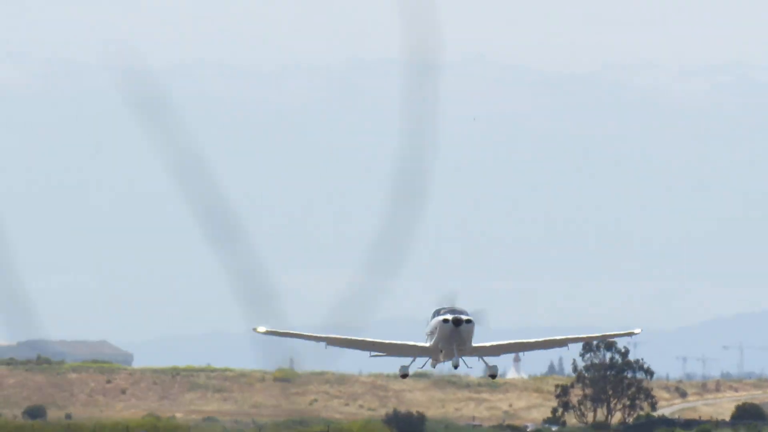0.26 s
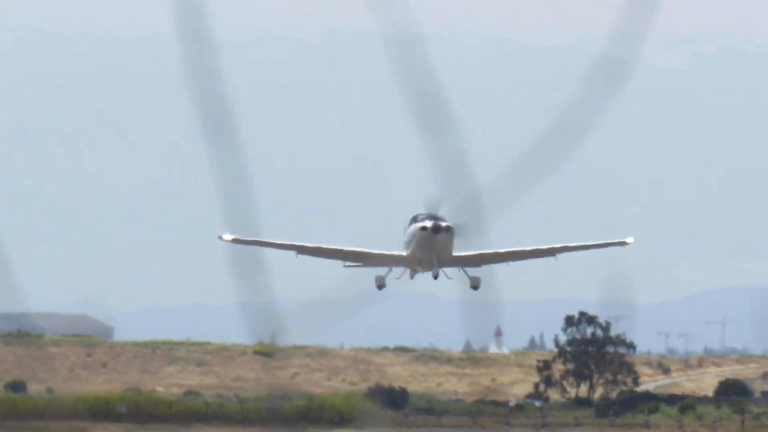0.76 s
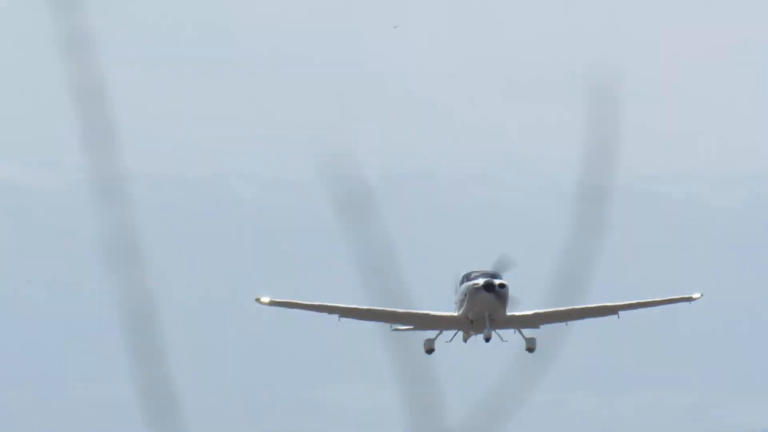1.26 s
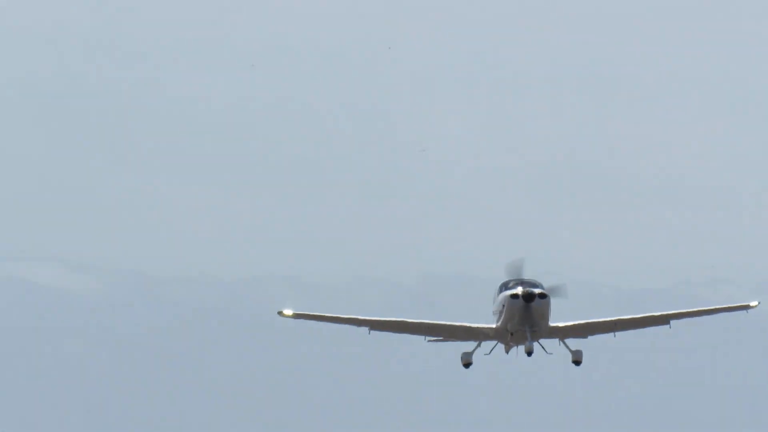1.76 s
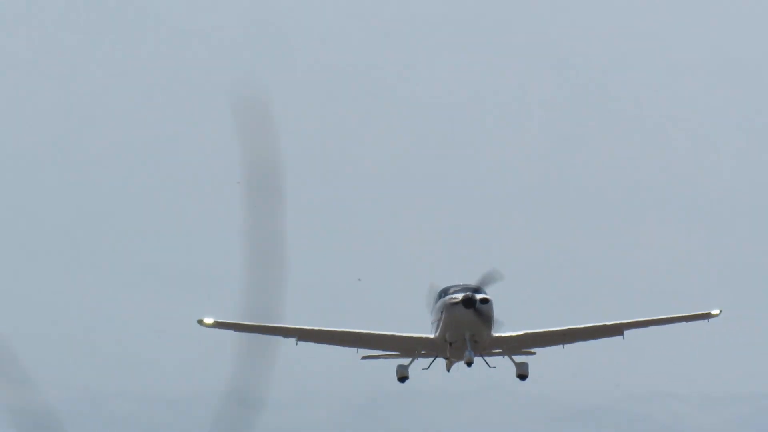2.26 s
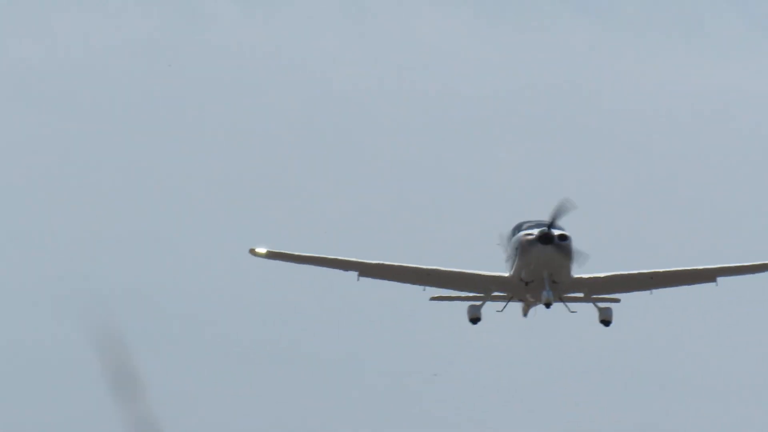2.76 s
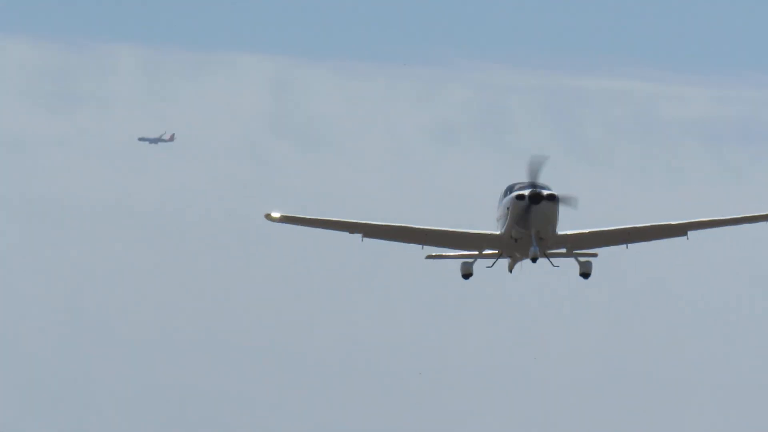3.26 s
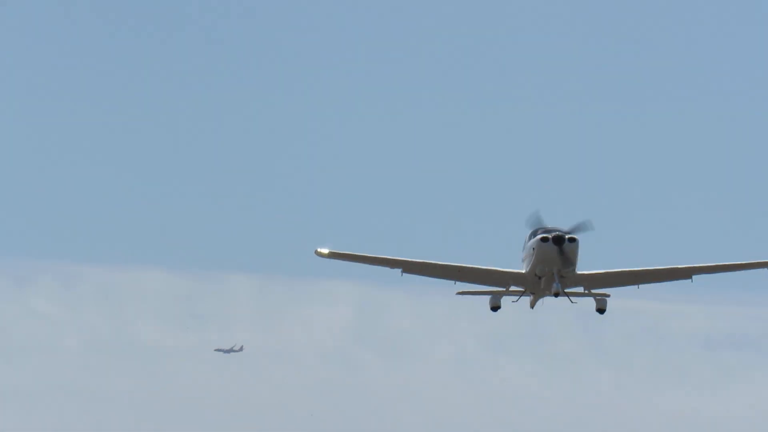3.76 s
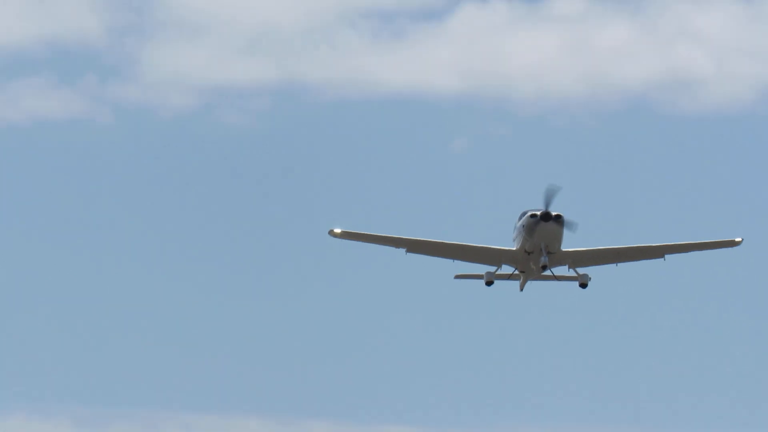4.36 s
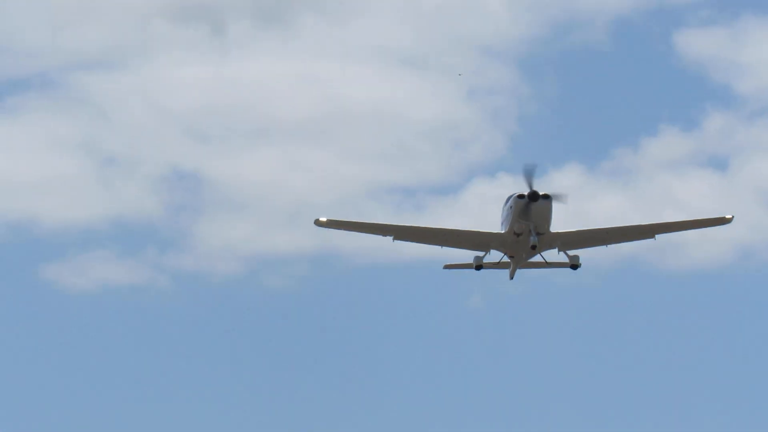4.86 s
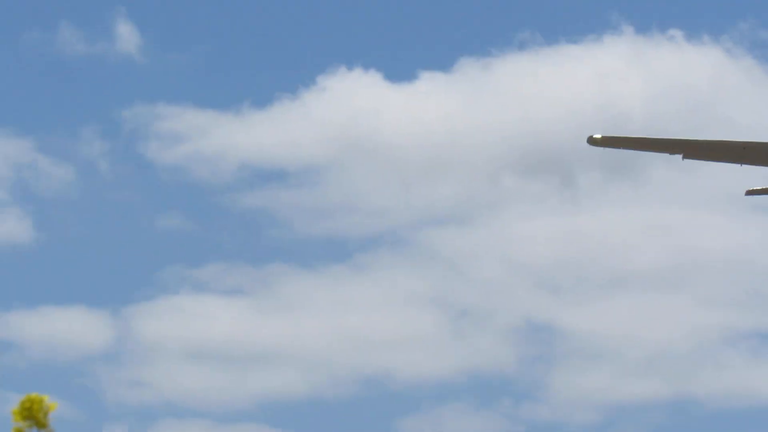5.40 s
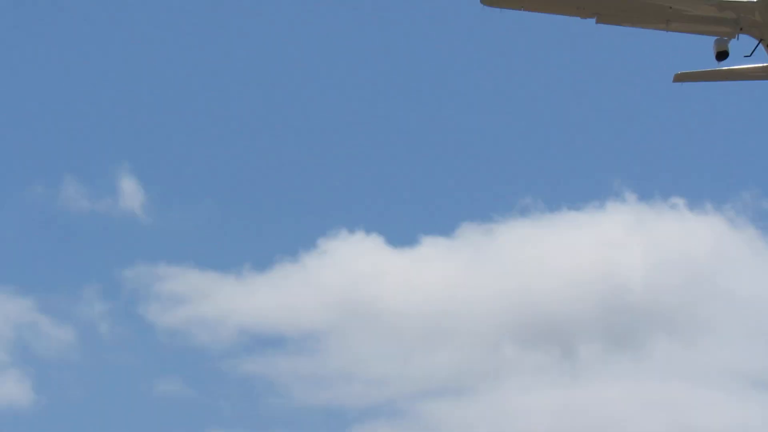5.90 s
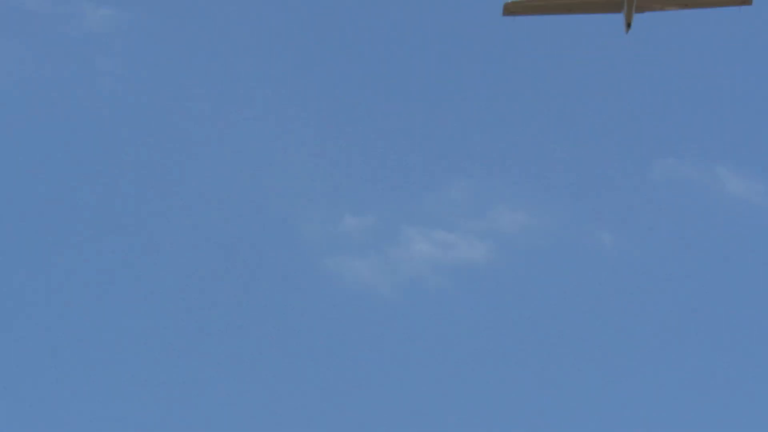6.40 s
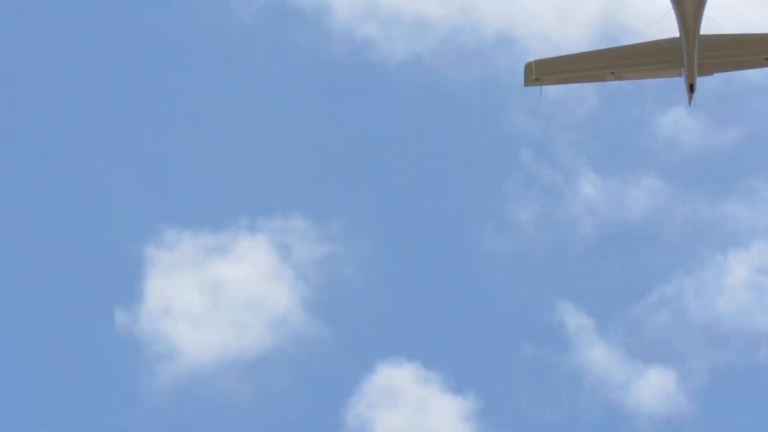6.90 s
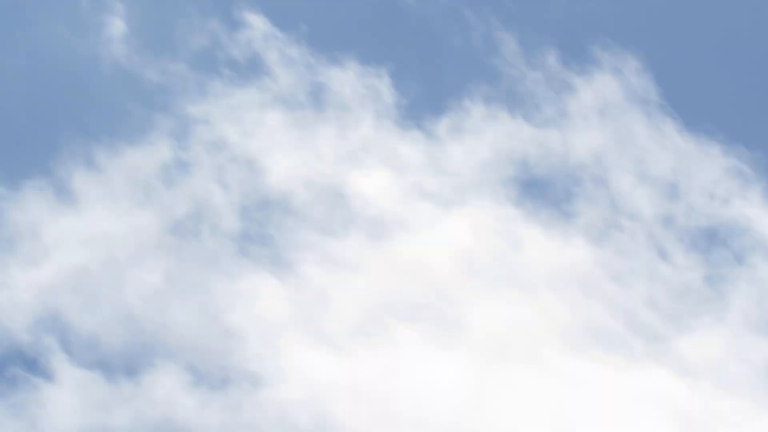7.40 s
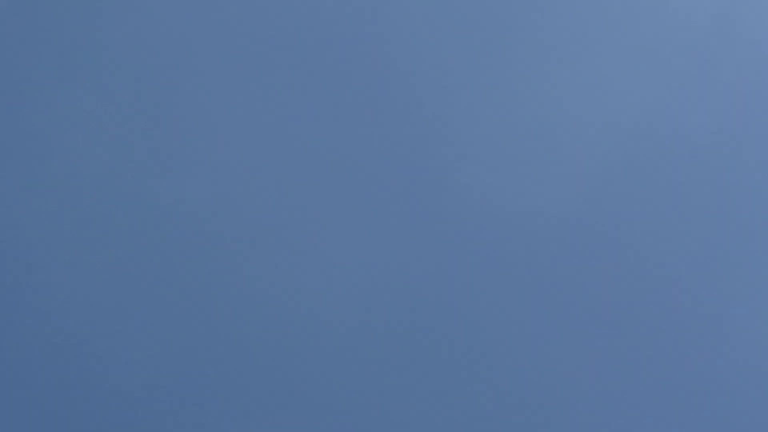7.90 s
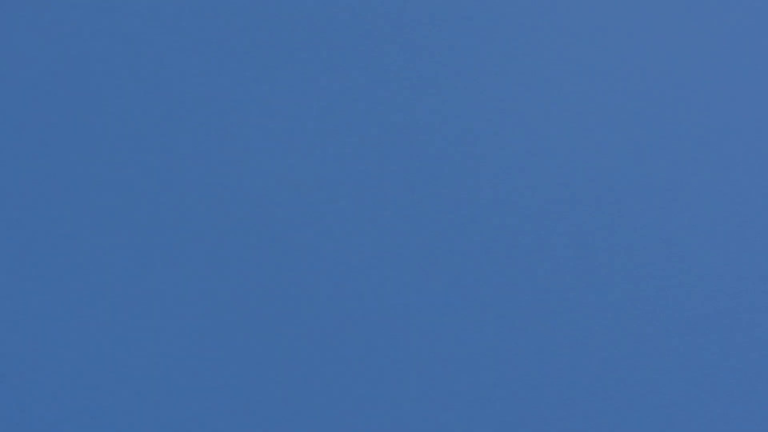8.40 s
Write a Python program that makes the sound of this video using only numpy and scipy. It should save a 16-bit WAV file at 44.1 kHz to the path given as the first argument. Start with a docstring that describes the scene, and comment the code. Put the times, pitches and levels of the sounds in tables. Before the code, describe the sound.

A small propeller plane approaches over a grassy airfield, its steady buzzing drone swelling and thinning with ground echo and moving air. Gusts rumble, flutter and slap the camera microphone, pushing left and right apart, with heavy crackle around three and six seconds and a few tiny handling ticks. Near the end the plane roars overhead, barking and hissing, its pitch dropping.

```python
"""Out on an airfield, gusts slap the microphone from the start while a propeller plane drones far off.
It climbs off the runway toward the camera: six-cylinder exhaust and two-blade propeller are built on one shaft's
turns, the blades chop the air noise, and an echo off the ground makes the tones swell and cancel.
Thick spells of turbulence crackle near 3.3 and 6.4 s, pushing the two channels apart and at times overloading them.
Just after 8 s the plane passes right overhead, its drone sinking in pitch as the travel time of the sound changes."""
import sys
import numpy as np
from scipy import signal
from scipy.fft import rfft, irfft, next_fast_len
from scipy.io import wavfile
from scipy.ndimage import uniform_filter1d, map_coordinates

SR = 44100
rng = np.random.default_rng(int(sys.argv[2]) if len(sys.argv) > 2 else 0)


def file_out(sig):
    """Save sig as 16-bit WAV at sys.argv[1]."""
    # one column per channel
    cols = np.atleast_2d(sig).T
    # limit, then scale
    lim = np.clip(cols, -1, 1)
    pcm = np.round(lim * 32767).astype(np.int16)
    wavfile.write(sys.argv[1], SR, pcm)


N = 381465

# Colour of the air rush with the nose toward the microphone. Each row: frequency in Hz, relative level in dB.
RUSH_AHEAD = [(30, -18), (100, 9.5), (400, 5), (680, 3), (810, 7), (940, 2.5), (1180, 3.5), (1620, -2),
              (1870, 7.5), (2350, .5), (2830, -5), (3150, -3.5), (3600, -8), (5500, -20), (10000, -36.5),
              (16000, -53.5)]
# Colour of the high hiss under the belly. Each row: frequency in Hz, relative level in dB.
HISS_BELOW = [(1500, -40), (3200, -5), (5300, 3.5), (6500, 0), (9000, -1.5), (12000, -4.5), (15000, -12)]
CLOSEST_M, SOUND_M_PER_S = 36.94, 343


def plane(shimmer_db=1.0, rush_width_db=-14, hiss_width_db=-17):
    """Shaft-locked engine and blades sit in the centre; scattered air noise spreads them a little to the sides."""
    # Swells and lulls as restless air carries the sound. Each row: centre in seconds, width in seconds, gain in dB.
    air_swells = [(.22, .4, 3), (1.28, .25, 4), (1.7, .3, 4), (2.33, .55, 9.5), (3.88, .25, 2.5),
                  (4.62, .5, 4.5), (5.05, .2, 3), (5.45, .22, 6), (5.75, .3, 2), (6.15, .15, 1),
                  (6.55, .15, -2), (6.7, .1, 1), (6.85, .1, -3), (7.03, .09, -4.5), (7.25, .14, 2),
                  (7.6, .1, 3), (7.79, .17, 4), (7.96, .1, 1.5)]
    # Colour of the air rush under the belly. Each row: frequency in Hz, relative level in dB.
    rush_below = [(30, -18.5), (100, 0), (400, 8), (700, 2), (1000, -2), (1550, 6), (2100, -3),
                  (2800, -3.5), (3800, -7.5), (5500, -13), (10000, -22), (16000, -64.5)]
    # Colour of the high hiss from ahead. Each row: frequency in Hz, relative level in dB.
    hiss_ahead = [(1500, -30), (3200, 3), (5300, 4), (6800, 2), (9000, -2), (12000, -18), (15000, -38)]

    turns, metres, angle = flight()
    swells_db = sum(db * swell(s, width) for s, width, db in air_swells)
    air = amp(swells_db + shimmer_db * wobble(7) * np.cos(np.radians(angle)))

    rasp_gain = air * carried(metres, loss_db_per_m=.047)
    rasp_gain = rasp_gain * beamed(angle, level_db=-39, beam_db=8, centre_deg=74, width_deg=38)
    rush_gain = air * carried(metres, loss_db_per_m=.045)
    rush_gain = rush_gain * beamed(angle, level_db=-37.3, beam_db=5.8, centre_deg=82, width_deg=30)
    hiss_gain = air * carried(metres, loss_db_per_m=.05)
    hiss_gain = hiss_gain * beamed(angle, level_db=-54.5, beam_db=15, centre_deg=82, width_deg=34)

    rush = rush_gain * aspect(angle, patchy(noise(RUSH_AHEAD)), noise(rush_below))
    hiss = hiss_gain * aspect(angle, noise(hiss_ahead), noise(HISS_BELOW))
    blades = rush * chop(turns, angle, .24, .64) + hiss * chop(turns, angle, .27, .72)
    direct = drone(turns, metres, angle) + near_echo(rasp_gain * rasp(turns, angle) + blades, angle)

    # The rush widens as the plane comes abeam.
    wide_rush = amp(rush_width_db) * np.sin(np.radians(angle)) * rush_gain * noise(rush_below)
    wide_hiss = amp(hiss_width_db) * hiss_gain * noise(HISS_BELOW)
    return opposed(wide_rush + wide_hiss, ground_echo(direct, angle) + hum(turns))


def drone(turns, metres, angle, waver_db=1.3, far_waver_db=.5, half_waver_db=3.0,
          drift=.02, far_drift=.012, skew=.1, loss_db_per_m=.033):
    """Whole shaft orders stay nearly in step; uneven cylinders add half orders; distance makes phases waver more."""
    # Engine and blade tones before wavering and distance. Each row: multiple of the shaft rate,
    # then level in dB far off, near, at a slant, abeam and behind.
    orders = [(2, -30, -30, -37, -33, -36), (3, -35, -33, -21.5, -27, -23), (3.5, -49, -49, -44, -41, -43),
              (4, -33, -31, -32, -31, -31), (4.5, -38, -36, -39, -31, -40), (5, -39, -39, -44, -44, -44),
              (5.5, -49, -49, -42, -42, -42), (6, -27, -31, -29, -20, -26), (6.5, -33, -35, -43, -41, -42),
              (7, -46, -48, -43, -51, -45), (7.5, -42, -46, -50, -47, -49), (8, -34, -41, -51, -42, -55),
              (9, -46, -46, -38, -24.5, -33), (10, -47, -33, -46, -46, -48),
              (11, -41.5, -33.5, -36, -50, -48), (11.5, -47, -47, -52, -49, -51),
              (12, -52, -52, -49, -26, -47), (13, -42, -41, -53, -55, -56), (14, -47, -48, -42, -50, -38),
              (16, -47, -47, -53, -57, -58), (18, -58, -58, -53, -52, -53), (19, -60, -60, -45, -54, -49)]
    # Angles from the nose in degrees for those five views: far off, near, at a slant, abeam, behind.
    view_deg = [12.5, 17, 36, 67, 108]

    far = 1 - CLOSEST_M / metres
    total = np.zeros(N)
    for order, *levels in orders:
        level_db = np.interp(angle, view_deg, levels)
        stray = (drift + far_drift * far) * wobble(25)  # in cycles of this tone
        if order % 1:
            total += amp(level_db + half_waver_db * wobble(9)) * tone(turns + stray / order, order)
        else:
            gain = amp(level_db + (waver_db + far_waver_db * far) * wobble(9))
            total += gain * np.sqrt(2) * np.cos(2 * np.pi * (order * turns + skew + stray))
    return carried(metres, loss_db_per_m) * total


def tone(turns, order):
    """A sine at one multiple of the shaft rate, from a random phase, at rms 1."""
    return np.sqrt(2) * np.sin(2 * np.pi * (order * turns + rng.random()))


def hum(turns, waver_db=1.8):
    """Single engine orders stand out for a while as the plane draws near."""
    # Each row: centre in seconds, width in seconds, multiple of the shaft rate, level in dB before wavering.
    hum_swells = [(2.65, 1.5, 8, -40.5), (4.65, 1.1, 8, -44)]
    return sum(amp(db + waver_db * wobble(6)) * swell(s, width) * tone(turns, order)
               for s, width, order, db in hum_swells)


def rasp(turns, angle, ahead_half_db=-2, below_half_db=-10, jitter_turns=.0009, sharp=1.5, skew=.1,
         bank_db=1.5, gas_db=-9, firings_per_turn=6):
    """Upper exhaust harmonics: a buzz from ahead; below, barks with puffs of gas, the banks strong and weak in turn."""
    # Colour of the rasp from ahead. Each row: frequency in Hz, relative level in dB.
    rasp_ahead = [(350, -50), (600, -6), (810, 5), (940, 1), (1150, 5.5), (1400, 2), (1620, -4), (1850, 1),
                  (2600, -14), (4500, -27), (9000, -80)]
    # Colour of the rasp under the belly. Each row: frequency in Hz, relative level in dB.
    rasp_below = [(350, -50), (600, -12), (820, -3), (960, 7), (1090, 7), (1280, 4.5), (1500, 3.5),
                  (1750, -3.5), (2100, -8.5), (3000, -14.5), (4500, -26), (9000, -70)]

    shaky = turns + jitter_turns * wobble(60)
    # Three patterns fade in and out against each other.
    ahead = unit(sum(wobble(2.6) * firing_pattern(shaky, ahead_half_db) for _ in range(3)))
    firing = firings_per_turn * shaky + skew
    barks = np.exp(sharp * np.cos(2 * np.pi * firing)) * amp(bank_db * np.cos(np.pi * firing))
    voice = coloured(barks * firing_pattern(shaky, below_half_db), rasp_below)
    gas = coloured(barks * rng.standard_normal(N), rasp_below)
    return aspect(angle, coloured(ahead, rasp_ahead), unit(voice + amp(gas_db) * gas))


def firing_pattern(turns, half_db, size=4096):
    """A buzz that repeats every two turns; half_db sets how unlike the two turns are."""
    k = np.arange(size // 2 + 1)  # cycles per two turns; odd ones are the half orders
    phases = np.exp(2j * np.pi * rng.random(len(k)))
    cycle = irfft(phases * amp(half_db * (k % 2)) * (k < size // 16))
    return unit(np.interp(turns / 2 % 1 * size, np.arange(size), cycle))


def chop(turns, angle, ahead_depth, below_depth, lead=.14, rise=.1, fall=.13, uneven_db=2.1, crackle_db=1):
    """A ragged puff, quick to rise and slower to fade, each time one of two blades swings toward the listener."""
    # Deepest abeam, shallower at a slant ahead and behind (degrees from the nose).
    depth = np.interp(angle, [36, 67, 120], [ahead_depth, below_depth, ahead_depth])
    since = (2 * turns + lead) % 1  # lead, rise and fall are in blade passes
    puff = (1 - np.exp(-(since / rise) ** 2)) * np.exp(-since / fall)
    puff = puff * amp(uneven_db * wobble(70) + crackle_db * wobble(800))
    return 1 - depth + depth * unit(puff)


def patchy(x, patchy_db=2.5):
    """Distant sound fades in and out in patches of time and frequency."""
    z = signal.stft(x, nperseg=512)[2]
    over_frequency = uniform_filter1d(rng.standard_normal(z.shape), 5, 0)
    field = uniform_filter1d(over_frequency, 20, 1)
    return unit(signal.istft(z * amp(patchy_db * unit(field)), nperseg=512)[1][:N])


def aspect(angle, ahead, below, from_deg=22, to_deg=52):
    """The nose-on sound gives way to the sound under the belly, at constant power."""
    under = np.clip((angle - from_deg) / (to_deg - from_deg), 0, 1)
    return np.sqrt(1 - under) * ahead + np.sqrt(under) * below


def flight(shaft_hz=44.358, speed_m_per_s=43.39, overhead_s=8.12):
    """Shaft turns, distance in m and angle from the nose in degrees as heard; the travel time bends the pitch."""
    sent = np.arange(-3, 10, .002)
    to_go = speed_m_per_s * (overhead_s - sent)  # a straight path at steady speed and throttle
    metres = np.hypot(to_go, CLOSEST_M)
    heard = sent + (metres - CLOSEST_M) / SOUND_M_PER_S
    angle = np.degrees(np.arctan2(CLOSEST_M, to_go))
    return [np.interp(np.arange(N) / SR, heard, v) for v in (shaft_hz * sent, metres, angle)]


def carried(metres, loss_db_per_m):
    """Gain left after spreading and losses along the way, 1 at the closest distance."""
    return CLOSEST_M / metres * amp(-loss_db_per_m * (metres - CLOSEST_M))


def beamed(angle, level_db, beam_db, centre_deg, width_deg):
    """Gain of a source that is loudest near the plane of the propeller."""
    return amp(level_db + beam_db * np.exp(-((angle - centre_deg) / width_deg) ** 2))


def ground_echo(x, angle, share=.64, dull_hz=1500, stray_s=.00011, climb_deg=2.3, mic_height_m=1.92):
    """The ground's dull copy lags more as the plane rises, so tones swell and cancel; moving air shifts the lag."""
    lag_s = 2 * mic_height_m / SOUND_M_PER_S * np.sin(np.radians(angle - climb_deg))
    lag_s = lag_s + stray_s * wobble(2.5) * np.cos(np.radians(angle))
    dull = filtered(x, lambda hz: 1 / (1 + (hz / dull_hz) ** 2))
    return x + share * delayed(dull, lag_s)


def near_echo(x, angle, share=.22, ahead_s=.00155, abeam_s=.00197):
    """A surface close to the microphone combs the rush, hiss and rasp."""
    return x + share * delayed(x, np.interp(angle, [16, 67], [ahead_s, abeam_s]))  # degrees from the nose


def delayed(x, lag_s):
    """x heard lag_s later."""
    n = np.arange(N)
    return np.interp(n - lag_s * SR, n, x)


def wind(breeze_db=-28.7, breeze_swing_db=2.5, buffet_db=.4, stir_db=-27, spit_db=6.5):
    """Big eddies rumble in lumps over a breeze; small ones flutter and crackle, growing with the push squared."""
    # Rumbling gusts on the microphone. Each row: centre in seconds, width in seconds, level in dB before buffet_db.
    gust_rows = [(.08, .05, -22), (.15, .05, -16), (.38, .1, -13), (.58, .14, -19), (.755, .15, -16),
                 (1.05, .22, -19), (1.52, .18, -18.5), (1.71, .08, -17), (1.87, .05, -23), (2.44, .22, -18),
                 (2.68, .14, -14.5), (2.88, .15, -14.5), (3.3, .45, -18), (3.67, .2, -14), (4.15, .3, -27),
                 (5.15, .04, -13), (5.23, .1, -20), (5.56, .16, -18), (6.01, .15, -14), (6.45, .55, -20.5),
                 (7.04, .07, -21), (7.27, .14, -20), (7.65, .13, -17), (7.94, .08, -21), (8.19, .07, -14),
                 (8.41, .14, -14)]
    # Spells of fast, crackling turbulence. Each row: centre in seconds, width in seconds, level in dB.
    flutter_rows = [(.785, .05, -43), (.9, .1, -46), (.97, .025, -37), (1.04, .05, -36), (1.125, .02, -37),
                    (1.158, .03, -41), (1.6, .25, -50), (2.85, .04, -39), (3.02, .08, -39),
                    (3.075, .03, -32), (3.125, .06, -26.5), (3.19, .07, -29), (3.27, .09, -26),
                    (3.34, .07, -22), (3.405, .06, -25), (3.47, .07, -38), (3.575, .03, -25),
                    (3.62, .06, -28), (3.68, .05, -23), (3.65, .5, -41), (3.785, .06, -31),
                    (4.14, .05, -44), (5.15, .05, -37), (6.06, .035, -27), (6.225, .05, -26),
                    (6.29, .09, -17), (6.375, .05, -18), (6.44, .08, -20), (6.53, .08, -23),
                    (6.62, .09, -21.5), (6.73, .12, -25), (6.9, .08, -38), (7.04, .05, -32),
                    (7.27, .12, -40), (7.68, .08, -32), (8.2, .06, -32), (8.4, .1, -34)]
    # Colour of the rumble. Each row: frequency in Hz, relative level in dB.
    buffet_colour = [(20, -21), (45, -4.5), (90, 2), (150, 3), (250, -.5), (400, -4.5), (550, -14),
                     (800, -34), (1200, -51), (2000, -82), (5000, -81.5), (15000, -84)]
    # Colour of the flutter. Each row: frequency in Hz, relative level in dB.
    flutter_colour = [(80, -16), (300, 10), (550, 6.5), (850, 3.5), (1150, 3.5), (1500, -6.5),
                      (2100, -19.5), (3200, -35), (6000, -55), (15000, -71.5)]

    breeze = amp(breeze_db + breeze_swing_db * wobble(8))
    gust_power = sum((amp(db) * swell(s, width)) ** 2 for s, width, db in gust_rows)
    push = np.sqrt(breeze ** 2 + gust_power)
    spells = sum(amp(db) * swell(s, width, steep=4) for s, width, db in flutter_rows)
    stir = amp(stir_db) * push ** 2 + spells

    lumps_db = 1.5 * wobble(55)
    spits_db = spit_db * np.tanh(.6 * wobble(420) + .25 * wobble(110))
    buffet = amp(buffet_db) * push * unit(amp(lumps_db))
    flutter = stir * unit(amp(lumps_db + spits_db))
    rumble = buffet * gust(buffet_colour, shared_db=-11.5, lean=0.01)
    return rumble + flutter * gust(flutter_colour, shared_db=-11.5, lean=0.17) + grit(stir)


def gust(spectrum, shared_db, lean):
    """Turbulence that drives the channels oppositely, the left a little harder."""
    push = noise(spectrum)
    return opposed(push, lean * push + amp(shared_db) * noise(spectrum))


def grit(stir, pops_per_s=400, scatter_db=4, grit_db=-11.5, shared_db=-3):
    """Tiny pops at random moments, their strength following the turbulence."""
    # Colour of the pops. Each row: frequency in Hz, relative level in dB.
    grit_colour = [(300, -10), (800, 2), (1250, 4.5), (1750, -4), (2500, -20), (4000, -35), (6000, -47),
                   (12000, -80)]
    pops = (rng.random(N) < pops_per_s / SR) * rng.choice([-1, 1], N)
    pops = pops * amp(scatter_db * np.clip(rng.standard_normal(N), -2, 2))
    pops = amp(grit_db) * stir * coloured(pops, grit_colour)
    return opposed(pops, amp(shared_db) * pops * np.tanh(2 * wobble(80)))


def slaps(push_db=9, swing_hz=210, width_s=0.0046, snap_db=4, knock_db=10.5, shared=0.19, shared_snap_db=-5):
    """Each eddy is one short pressure swing with a knock and a noisy snap; overloads add a sharp click."""
    # Single eddies slapping the microphone. Each row: start in seconds, swing level in dB before push_db,
    # snap level in dB before snap_db or knock_db, snap half-width in seconds.
    slap_rows = [(0.361, -15, -56, .003), (0.381, -13, -35, .003), (0.415, -12, -52, .003),
                 (0.477, -15, -44, .004), (0.652, -12, -36, .005), (0.75, -11, -31, .0025),
                 (0.777, -13, -44, .003), (0.885, -25, -47, .003), (0.938, -27, -46, .003),
                 (0.966, -16, -36, .005), (0.99, -26, -46, .003), (1.014, -22, -40, .002),
                 (1.025, -24, -42, .002), (1.039, -17, -36, .004), (1.116, -25, -40, .003),
                 (1.126, -25, -41, .003), (1.278, -11.5, -35, .002), (1.359, -15, -37, .003),
                 (1.431, -12.5, -31, .0025), (2.811, -12.5, -42, .003), (2.843, -13, -41, .003),
                 (2.964, -13, -33, .0025), (3.067, -30, -37, .004), (3.118, -22, -35, .004),
                 (3.168, -18, -37, .003), (3.337, -17, -31, .003), (3.368, -19, -33, .005),
                 (3.383, -15, -36, .002), (3.419, -21, -34, .003), (3.49, -20, -35.5, .005),
                 (3.543, -20, -35, .003), (3.565, -12, -32.5, .003), (3.661, -15, -29.5, .007),
                 (3.69, -15, -36, .004), (3.702, -14, -32, .002), (4.018, -28, -46, .003),
                 (5.087, -18, -46, .003), (5.139, -13, -43, .003), (5.155, -13, -40, .004),
                 (6.052, -14, -34, .005), (6.198, -20, -33, .006), (6.274, -14, -29, .003),
                 (6.351, -18.5, -29.5, .003), (6.368, -16, -28.5, .004), (6.377, -17, -27.5, .002),
                 (6.442, -18, -31, .003), (6.456, -17, -28.5, .004), (6.519, -19, -29.5, .002),
                 (6.591, -20, -30, .004), (6.693, -18, -28.5, .002), (6.749, -16, -28, .004)]
    # Colour of knock and snap. Each row: frequency in Hz, relative level in dB.
    snap_colour = [(150, -15), (500, 6.5), (900, 3), (1300, -4), (2000, -20), (3500, -50), (9000, -76)]
    # The hardest eddies overload the microphone. Each row: start in seconds, click peak in dB.
    overloads = [(.382, -29), (.751, -15), (1.432, -16), (2.965, -22), (3.338, -28), (3.565, -33),
                 (3.661, -25), (3.702, -28), (6.274, -26), (6.352, -25), (6.377, -22), (6.442, -26),
                 (6.693, -26), (6.748, -25)]
    # Colour of that click. Each row: frequency in Hz, relative level in dB.
    click_colour = [(150, -4), (450, 3), (900, 1), (1400, -2), (2000, -8), (3800, -20), (7700, -32),
                    (14000, -45)]

    t = np.arange(N) / SR
    push, snap = np.zeros((2, N))
    chances = rng.standard_normal((len(slap_rows), 2))
    for (s, db, snap_level, snap_width), (pitch, phase) in zip(slap_rows, chances):
        near = slice(round((s - .02) * SR), round((s + .02) * SR))
        u = t[near] - s - .001  # the crest comes 1 ms after the start
        swing = np.sin(2 * np.pi * swing_hz * np.exp(0.15 * pitch) * u + np.pi * phase)
        push[near] += amp(db + push_db) * np.exp(-(u / width_s) ** 2) * swing
        snap[near] += amp(snap_level + snap_db) * np.exp(-(u / snap_width) ** 2)
    knocks = clicks([(s + .001, level + knock_db) for s, _, level, _ in slap_rows], snap_colour)
    crest = knocks + amp(shared_snap_db) * snap * noise(snap_colour) + clicks(overloads, click_colour)
    return opposed(push + snap * noise(snap_colour), shared * push + crest)


def clicks(rows, spectrum, tail_db=-27, tail_t60=.03):
    """One coloured pulse with a short, rough tail for each (start in s, peak dB)."""
    train = np.zeros(N)
    t = np.arange(SR // 20) / SR
    for s, db in rows:
        pulse = amp(tail_db - 60 * t / tail_t60) * rng.standard_normal(len(t)) + (t == 0)
        train[round(s * SR):][:len(t)] += amp(db) * pulse
    pulses = coloured(train, spectrum)
    return pulses * train.max() / pulses.max()  # colouring leaves the highest peak as it was


def scrapes(grain_db=4):
    """Short grainy rubs with a bright edge on the camera body."""
    # Each row: centre in seconds, width in seconds, level in dB.
    scrape_rows = [(.2, .3, -76), (.365, .05, -64), (2.85, .06, -64), (3.662, .018, -49)]
    # Colour of the rubs. Each row: frequency in Hz, relative level in dB.
    crack_colour = [(500, -4), (1500, 4.5), (2500, 6), (4000, 0), (8000, -8), (15000, -20)]
    level = sum(amp(db) * swell(s, width) for s, width, db in scrape_rows)
    level = level * unit(amp(grain_db * wobble(500)))
    return level * opposed(noise(crack_colour), noise(crack_colour))


def ticks(gain_db=-4, t60=0.019):
    """Dry little ticks from the handled camera: noise that starts at once and dies by 60 dB in t60 seconds."""
    # Each row: start in seconds, level in dB before gain_db.
    tick_rows = [(1.8295, -54.5), (2.7025, -45.5), (2.8515, -49), (4.6863, -31)]
    # Colour of the ticks. Each row: frequency in Hz, relative level in dB.
    tick_colour = [(500, -14.5), (1400, -6), (2000, 7), (3000, -11.5), (6000, -21.5), (14000, -41.5)]
    t = np.arange(N) / SR
    level = sum(amp(db + gain_db - 60 * np.abs(t - s) / t60) * (t >= s) for s, db in tick_rows)
    return level * opposed(noise(tick_colour), noise(tick_colour))


def dips(fall_s=.01):
    """A gain on the distant sound that drops quickly and creeps back, placed near hard blows of wind."""
    # Each row: start in seconds, depth in dB, recovery time constant in seconds.
    dip_rows = [(.4, -9, .3), (.77, -12, .22), (1.44, -6, .12), (2.97, -12, .2), (5.15, -3, .1)]
    t = np.arange(N) / SR
    return amp(sum(db * np.clip((t - s) / fall_s, 0, 1) * np.exp(-np.abs(t - s) / recovery)
                   for s, db, recovery in dip_rows))


def airfield(rush_db=-72, hiss_db=-88, waver_db=2):
    """Faint open-air background: slowly wavering noise, the same in both channels."""
    return amp(waver_db * wobble(4)) * (amp(rush_db) * noise(RUSH_AHEAD) + amp(hiss_db) * noise(HISS_BELOW))


def amp(db):
    """Decibels to gain."""
    return 10 ** (np.asarray(db) / 20)


def unit(x):
    """Scale to rms 1."""
    return x / np.sqrt(np.mean(x ** 2) + 1e-20)


def wobble(rate):
    """A smooth random curve, rate knots a second."""
    knots = rng.standard_normal(int(N * rate / SR) + 4)
    coarse = np.linspace(0, N, 8192)
    return np.interp(np.arange(N), coarse, map_coordinates(knots, [coarse * rate / SR]))


def swell(s, width, steep=2):
    """A smooth rise and fall centred on s seconds; the steeper, the flatter its top."""
    near = np.arange(max(0, int((s - 2 * width) * SR)), min(N, int((s + 2 * width) * SR)))
    shape = np.zeros(N)
    shape[near] = np.exp(-np.abs(2 * (near / SR - s) / width) ** steep)
    return shape


def filtered(x, response):
    """x times a response of frequency in Hz."""
    size = next_fast_len(N + 8192)
    return irfft(rfft(x, size) * response(np.fft.rfftfreq(size, 1 / SR)), size)[..., :N]


def coloured(x, spectrum):
    """x shaped by (Hz, relative dB) points, at rms 1."""
    f, db = np.transpose(spectrum)
    return unit(filtered(x, lambda hz: amp(np.interp(np.log(hz + 1), np.log(f), db))))


def noise(spectrum):
    """Fresh noise of that colour, at rms 1."""
    return coloured(rng.standard_normal(N), spectrum)


def opposed(side, mid):
    """Left and right from what they share and what pushes them apart."""
    return np.array([mid + side, mid - side])


def scene():
    """The plane and the airfield behind the wind and handling noise at the microphone."""
    return dips() * (plane() + airfield()) + wind() + slaps() + scrapes() + ticks()


def record(dry, notch_hz=690, notch_width_hz=45, notch_db=-9, top_hz=15400):
    """The camera has a narrow dip in its response, saturates toward full scale and passes nothing above top_hz."""
    voiced = filtered(dry, lambda hz: amp(notch_db * np.exp(-((hz - notch_hz) / notch_width_hz) ** 2)))
    saturated = voiced / (1 + voiced ** 8) ** (1 / 8)
    return filtered(saturated, lambda hz: hz < top_hz)


dry = scene()
out = record(dry)
file_out(out)
```